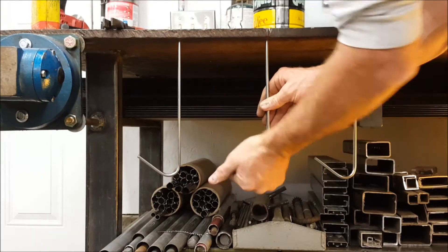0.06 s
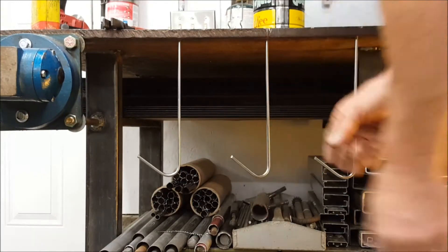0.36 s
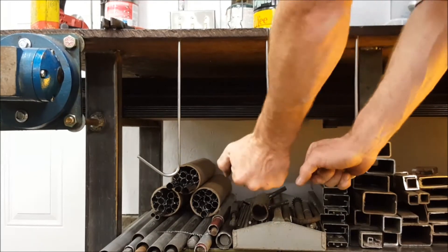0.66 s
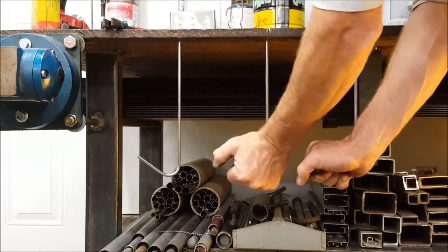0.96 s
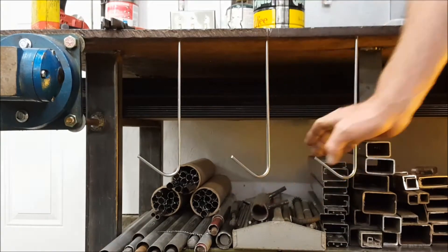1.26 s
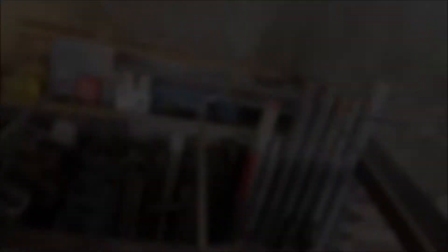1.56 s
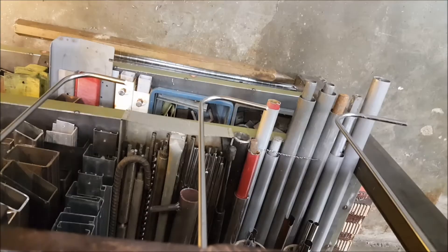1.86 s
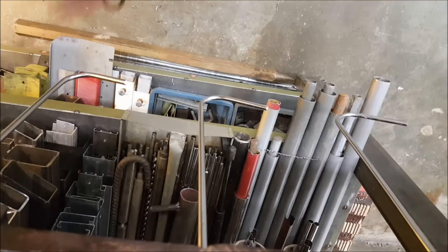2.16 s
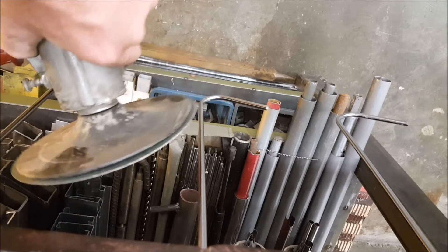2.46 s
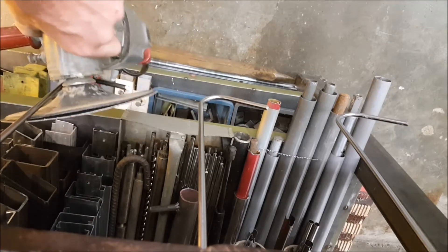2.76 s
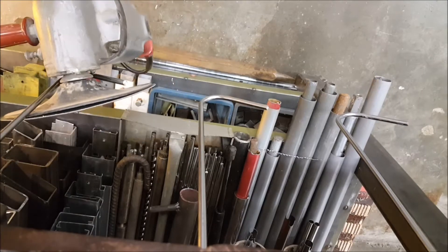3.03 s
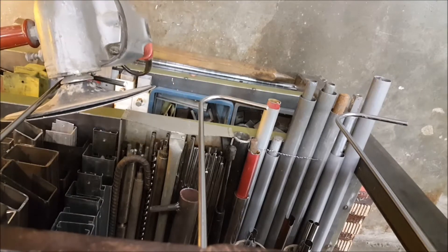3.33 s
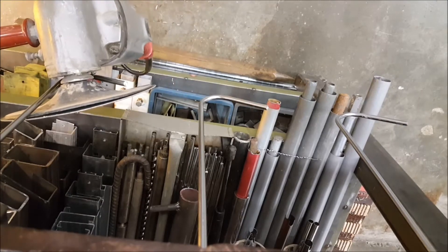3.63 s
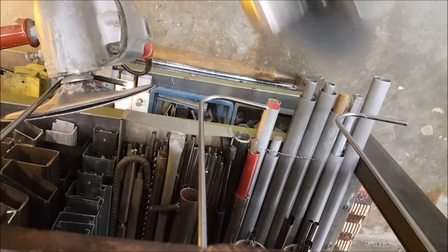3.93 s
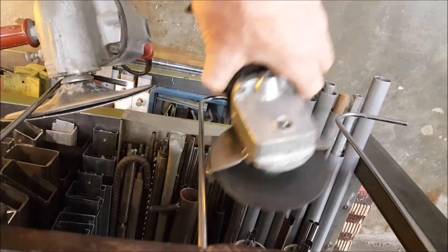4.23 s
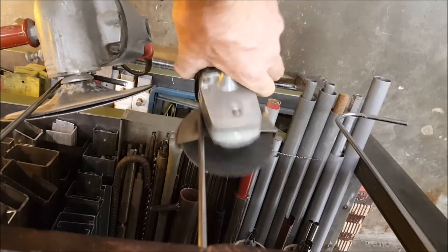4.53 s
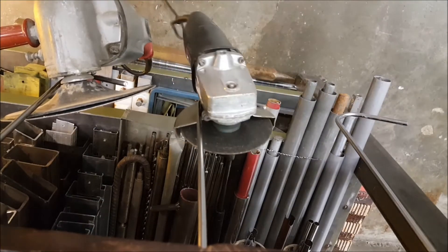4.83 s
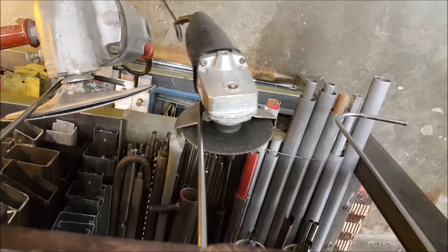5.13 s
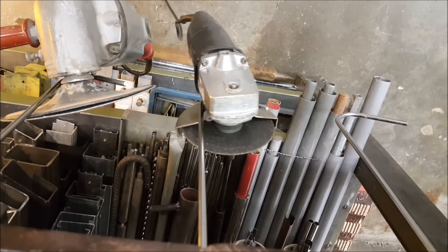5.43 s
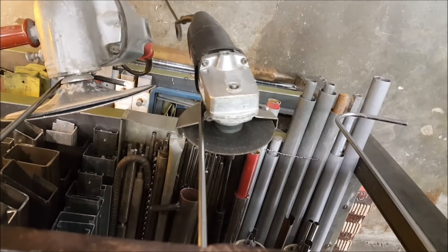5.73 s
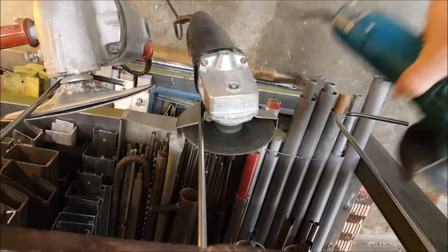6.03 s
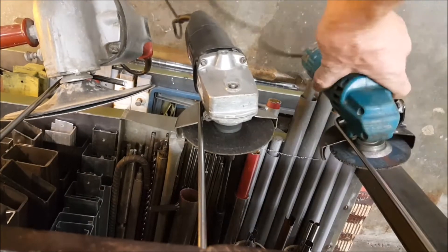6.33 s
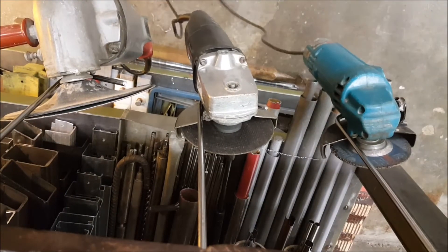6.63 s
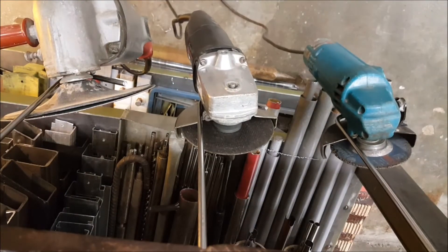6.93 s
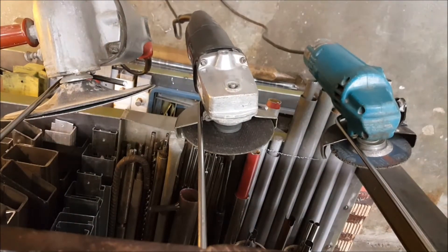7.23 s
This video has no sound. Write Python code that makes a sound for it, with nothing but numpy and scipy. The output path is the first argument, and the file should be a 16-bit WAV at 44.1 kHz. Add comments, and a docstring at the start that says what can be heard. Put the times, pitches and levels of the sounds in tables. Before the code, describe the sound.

Close metal-on-metal clanks and light clinks as three power tools drop onto steel hooks, with faint rustling and a low workshop hum.

```python
"""Three angle grinders hung one after another on steel hooks under a workbench, on a close stereo pair.
Each touches its hook, which rings, then drops, skids and settles; its weight thumps the bench.
Hands, sleeves and cords tick and rustle over the air of a small workshop and a distant motor's hum.
The air is heard first from in front of the bench, then, after a short overlap, from above it."""
import sys
import numpy as np
from scipy import signal
from scipy.fft import rfft, irfft
from scipy.io import wavfile
from scipy.ndimage import uniform_filter1d

SR = 44100
rng = np.random.default_rng(int(sys.argv[2]) if len(sys.argv) > 2 else 0)


def master(y):
    """Save y as 16-bit WAV."""
    cut = np.clip(np.atleast_2d(y).T, -1, 1)
    pcm = np.round(cut * 32767)  # scale
    wavfile.write(sys.argv[1], SR, pcm.astype(np.int16))


N = 329977
TIME = np.arange(N) / SR
SIZE = 2 ** 15  # samples in one contact's sound
AGE = np.arange(SIZE) / SR
BINS = np.fft.rfftfreq(SIZE, 1 / SR)

# Where each grinder hangs. Each entry: left minus right in dB, room share in dB of clanks, of thumps.
PLACES = {"left": (0, -1.3, -14), "middle": (0, -4, -2.2), "right": (0.8, -4, -17.5)}


def clanks(casings):
    """Metal meets hook as each grinder touches, drops and settles; each spot favours other modes."""
    # Each row: start in seconds, grinder, level in dB, tilt in dB per octave, t60 in seconds.
    hits = [ (2.5113, "left", -32, 3, 0.045), (2.515, "left", -28, 8.5, 0.039),
            (2.6475, "left", -24, 3, 0.042), (2.651, "left", -14.5, 4, 0.055),
            (2.6754, "left", -20.5, -1.5, 0.045), (2.6935, "left", -21.5, -5, 0.035),
            (2.771, "left", -34, 2.5, 0.022), (3.4205, "left", -39, -1, .014),
            (3.4635, "left", -37, 6, .012), (4.3394, "middle", -31.5, -.5, 0.045),
            (4.3735, "middle", -33, -5, 0.047), (4.3832, "middle", -27, -2, 0.014),
            (4.444, "middle", -19, 4.5, 0.03), (4.518, "middle", -10.5, 6.5, 0.026),
            (4.531, "middle", -13, 1.5, 0.045), (4.5545, "middle", -18, 0, .014),
            (4.570, "middle", -21, -2, .02), (4.6012, "middle", -14, 1, .016),
            (4.6259, "middle", -8, 4, .009), (6.1545, "right", -24, 2, .03),
            (6.242, "right", -21, -0.5, .03), (6.245, "right", -11, 0.5, 0.065),
            (6.2568, "right", -16, -2.5, 0.035), (6.2605, "right", -15, 7, 0.017),
            (6.2755, "right", -15, 2.5, .02), (6.2897, "right", -9.5, -6.5, 0.018),
            (6.302, "right", -19.5, -4, 0.082)]
    for start, grinder, db, tilt_db, t60 in hits:
        pan_db, room_db, _ = PLACES[grinder]
        spot_db = casings[grinder] + mode_ripple(depth_db=2.3, spacing_hz=150)
        yield start, amp(db) * sides(pan_db) * clatter(spot_db, tilt_db, t60), room_db + glancing(t60)


def casing_responses():
    """Each grinder's colour in dB: gear housing, sheet-steel guard and small, well damped modes."""
    # Gear housings, by grinder. Each point: frequency in Hz, relative level in dB.
    housings = {"left": [(50, -43.5), (125, -18.5), (450, -15), (720, -12), (1000, -15.5), (1700, -11),
                (3000, -15.5), (4100, -11), (6000, -21), (9000, -21.5), (14000, -34.5), (16000, -32)],
                "middle": [(50, -41), (200, -5.5), (520, -11.5), (720, -8), (1400, -9), (1850, -9.5),
                (2400, -5.5), (3300, -5.5), (4400, 0.5), (9300, -4), (11800, -8.5), (16000, -9)],
                "right": [(100, -31), (300, -23), (950, -17), (1800, -20), (3000, -9.5), (5300, -9.5),
                (9000, -14.5), (13000, -17.5), (16000, -20)]}
    # Guard resonances, by grinder. Each row: centre in Hz, width in Hz, boost in dB.
    guards = {"left": [(3720, 260, 5), (4950, 260, 6), (12560, 500, 10)], "middle": [(4080, 240, 5),
              (4750, 400, 3), (14000, 1100, 8)], "right": [(2430, 130, 3.5), (4940, 220, 9), (7600, 500, 4),
              (14200, 400, 7)]}
    casings = {}
    for grinder, housing in housings.items():
        peaks = sum((amp(db) - 1) / np.hypot(1, 2 * (BINS - hz) / width) ** 2
                    for hz, width, db in guards[grinder])
        guard_db = 20 * np.log10(np.maximum(1 + peaks, .1))
        casings[grinder] = curve(housing, BINS) + guard_db + mode_ripple(depth_db=2, spacing_hz=130)
    return casings


def mode_ripple(depth_db, spacing_hz):
    """Ripple in dB from a crowd of small modes, fading towards the bass."""
    ripple = np.interp(BINS / spacing_hz, np.arange(1024), rng.standard_normal(1024))
    return depth_db * ripple * BINS / (BINS + 500)


def clatter(colour_db, tilt_db, t60, rise_s=0.00085, chatter_db=4.5):
    """A dying burst of tiny rebounds that share the blow's energy, coloured by what is struck."""
    rebounds = amp(chatter_db * np.minimum(unit(smooth_noise(SIZE, width=24)), 1))
    fall = amp(-60 * AGE / t60) * (1 - np.exp(-AGE / rise_s))
    burst = coloured(mic_noise(SIZE) * rebounds * fall, colour_db, tilt_db)
    return np.sqrt(np.mean(fall ** 2)) * unit(burst)


def hook_rings(flutter_db=3, flutter_s=.007, mute_t60=.08):
    """A hook rings until a hand or a grinder's weight mutes it; loose contact makes each mode flutter."""
    # Modes of hook and guard, by how they touch. Each row: frequency in Hz, level in dB, t60 in seconds.
    modes = {"bare": [(3441, -8, .2), (6400, -4, .1), (10000, 1, .2)], "left": [(1427, -5, .25),
             (1680, -9, .2), (4371, -8, .22), (5566, -10, .22), (5857, -5, .16), (6982, -7, .25),
             (9588, -8, .25), (9800, -7, .2), (12250, -7, .2)], "nudged": [(1500, -1, .12),
             (4100, -1, .08)], "squeezed": [(7900, -3, .04), (8540, 0, .05)], "shifted": [(1373, 0, .17),
             (7763, -7, .25), (9534, -3, .22), (14500, -1, .16), (14710, 2, .15)],
             "middle": [(3962, -6, .4), (4130, -5, .3), (4404, -7, .3), (7790, -9, .15), (9500, -9, .3),
             (10020, -1, .22), (10300, -3, .18), (13000, -11, .15)], "right": [(1728, -12, .25),
             (3440, -16, .35), (4850, -6, .35), (4950, 0, .22), (9453, -5, .25), (9620, -8, .2),
             (15330, -11, .2)], "pinched": [(4995, 0, .07), (12600, -13, .15)], "sliding": [(800, -5, .1),
             (2810, 0, .3)], "seated": [(720, 0, .08), (1040, 0, .2), (1180, -7, .1)],
             "rattling": [(3120, -3, .06), (3219, -8, .22), (3262, 4, .06), (3330, -6, .2),
             (4883, -13, .22), (4990, -10, .16)], "swinging": [(3441, 0, .6)], "shank": [(3850, 0, .8),
             (3868, -8, .5)], "loaded": [(700, -4, .6), (942, -1, .65), (1238, -10, .6), (1560, -11, .6),
             (2530, -8, .7)]}
    # Each row: start in seconds, kind of touch, level in dB, seconds until muted, room share in dB.
    strikes = [(.635, "bare", -59, .01, -6), (1.318, "swinging", -64, .5, -10),
               (2.514, "left", -41, .13, -7), (2.572, "nudged", -47, .02, -8),
               (2.656, "pinched", -17.5, .008, -14), (2.679, "pinched", -27, .004, -14),
               (2.702, "pinched", -30, .004, -14), (3.417, "nudged", -45, .015, -10),
               (3.443, "squeezed", -43, .008, -14), (2.77, "loaded", -54.5, .6, 0),
               (3.4521, "shifted", -47, 0.18, -20), (4.340, "middle", -51, .086, -8),
               (4.444, "middle", -41.5, .11, -5), (4.53, "shank", -47, 0.46, -12),
               (4.52, "sliding", -36, .12, -10), (4.61, "seated", -36.5, .1, -12),
               (6.156, "right", -36.5, .13, -4), (6.301, "rattling", -23, .15, -10),
               (6.29, "shank", -51, 0.66, -12)]
    # A guard sliding into the hook's bend raises the pitch.
    # Each entry: fraction by which it starts flat, settling time in seconds.
    glides = {"sliding": (.08, .015)}
    for start, touch, db, free_s, room_db in strikes:
        hz, mode_db, t60 = np.transpose(modes[touch])[:, :, None]
        flat, settle_s = glides.get(touch, (0, 1))
        turns = hz * (AGE - flat * settle_s * (1 - np.exp(-AGE / settle_s)))
        flutter = np.array([np.interp(AGE / flutter_s, np.arange(SIZE), rng.standard_normal(SIZE))
                            for _ in hz])
        muting_db = 60 * np.maximum(AGE - free_s, 0) / mute_t60
        level = amp(mode_db + flutter_db * flutter - 60 * AGE / t60 - muting_db)
        yield start, amp(db) * modes_at_mics(level, turns, spread=0.57), room_db


def bench_thumps():
    """A grinder's weight loads its hook over a few milliseconds; bench frame and grinder body ring."""
    # Each row: start in seconds, grinder, level in dB.
    landings = [(2.665, "left", -29), (2.695, "left", -38), (4.373, "middle", -45.5),
                (4.528, "middle", -50.5), (4.575, "middle", -41.5), (4.605, "middle", -48.5),
                (6.29, "right", -11.5)]
    # Modes of frame and body, by grinder. Each row: frequency in Hz, level in dB, t60 in seconds.
    modes = {"left": [(131, 5.5, 0.14), (205, 4.5, .1), (245, 3.5, 0.1), (576, -6, .15), (690, -7, 0.2)],
             "middle": [(120, 4.5, 0.078), (230, -3, .09), (407.3, -1.5, 0.09), (760, 1, 0.05)],
             "right": [(338, -5, 0.19), (388.4, -4.5, .23), (415, -1.5, 0.24), (446.3, -1.5, 0.21),
             (468, 14.5, 0.038), (496, -5.5, 0.19), (530, -5, 0.15), (615, -7, .24), (642, -10, .22),
             (713, -2.5, 0.14), (800, -7.5, 0.13), (877, -6, 0.067), (929, -10, 0.14), (2470, -15.5, 0.12)]}
    # Seconds that each grinder's weight takes to load its hook.
    load_s = {"left": .008, "middle": .006, "right": .0037}
    for start, grinder, db in landings:
        hz, mode_db, t60 = np.transpose(modes[grinder])[:, :, None]
        ring = modes_at_mics(amp(mode_db - 60 * AGE / t60), hz * AGE, spread=0.09)
        loading = 1 - np.exp(-(AGE / load_s[grinder]) ** 2)
        _, _, room_db = PLACES[grinder]
        yield start, amp(db) * ring * loading, room_db


def guard_skids(casings, room_db=0.5):
    """The guard skids along the hook in a run of tiny slips."""
    # Each row: start and length in seconds, grinder, level in dB, tilt in dB per octave.
    skids = [(2.655, 0.025, "left", -30.5, -1.5), (2.767, 0.023, "left", -37.5, 0),
             (3.412, 0.01, "left", -45.5, -0.5), (3.4375, 0.016, "left", -43.5, -0.5),
             (4.459, 0.016, "middle", -48, -5.5), (4.5, 0.032, "middle", -43.5, -1),
             (4.512, 0.069, "middle", -29, 1.5), (4.604, 0.047, "middle", -33, -1.5),
             (6.168, 0.027, "right", -42, -1.5), (6.25, 0.047, "right", -28.5, -3)]
    for start, length, grinder, db, tilt_db in skids:
        pan_db, _, _ = PLACES[grinder]
        yield start, amp(db) * sides(pan_db) * friction(length, casings[grinder], tilt_db), room_db


def friction(length, colour_db, tilt_db, slips_per_s=250, spread_db=3, slip_t60=0.018, fade_db=-6.5):
    """Slips of random time and size, each a short burst, fading as the slide slows."""
    slips = (rng.random(SIZE) < slips_per_s / SR) * amp(spread_db * rng.standard_normal(SIZE))
    slips[0] = 1
    power = signal.fftconvolve(slips ** 2 * (AGE < length), amp(-60 * AGE / slip_t60) ** 2)[:SIZE]
    grip = np.sqrt(abs(power) * length * SR / power.sum())
    slowing = amp(fade_db * np.minimum(AGE / length, 1))
    return coloured(mic_noise(SIZE) * grip * slowing, colour_db, tilt_db)


def light_taps(room_db=-10):
    """Fingers, cords and housings knock lightly, each on a spot with its own small modes."""
    # Each row: start in seconds, level in dB, tilt in dB per octave, t60 in seconds.
    taps = [(0.088, -46, 5.5, 0.11), (0.634, -49, 5.5, 0.13), (1.3566, -37.5, -6.5, 0.016),
            (1.8081, -40, -10.5, 0.014), (3.3796, -28.5, 2, 0.018), (3.453, -33, 10, 0.046),
            (3.798, -41.5, -1, 0.17), (3.966, -35.5, 3, 0.0063), (4.837, -25, 5, 0.0035),
            (5.313, -37.5, 1, 0.028), (5.65, -46.5, 2, 0.034), (5.685, -46.5, -6, 0.053),
            (5.838, -36.5, 0.5, 0.02), (6.700, -43.5, -6, 0.033), (6.712, -36, -6.5, 0.047),
            (7.207, -51.5, -5.5, 0.16)]
    # The colour the taps share. Each point: frequency in Hz, relative level in dB.
    colour = [(100, -10), (400, 1), (2000, 2), (3500, 5), (6000, -2), (10000, -7.5), (16000, -19)]
    for start, db, tilt_db, t60 in taps:
        spot_db = curve(colour, BINS) + mode_ripple(depth_db=3.6, spacing_hz=110)
        yield start, amp(db) * clatter(spot_db, tilt_db, t60), room_db + glancing(t60)


def hand_scrapes(room_db=-10):
    """A hand drags over the steel with a dull scrape."""
    # Each row: start and length in seconds, level in dB.
    drags = [(1.365, 0.05, -55.5), (1.636, 0.083, -56.5)]
    # Skin on steel. Each point: frequency in Hz, relative level in dB.
    colour = [(900, -5), (1900, -7), (3500, -14), (6000, -19)]
    for start, length, db in drags:
        yield start, amp(db) * friction(length, curve(colour, BINS), tilt_db=0), room_db


def sleeve_rustle(catch_db=2.5, pull_db=2.6, low_hz=1100, attack_s=.02, release_s=.03):
    """Sleeves and cords slide in uneven pulls full of small catches, starting quickly, then slowing."""
    # Each row: start and length in seconds, level in dB, fade in dB per second.
    moves = [(1.065, 0.44, -85, -6), (1.38, 0.39, -67.5, -4), (3.657, 0.13, -55, -73),
             (3.804, 0.31, -63.5, -26), (5.218, 0.21, -57, -40), (5.45, 0.61, -65, -2.5)]
    # Sliding cloth. Each point: frequency in Hz, relative level in dB.
    cloth = [(880, -3.5), (2040, -5), (8400, -5.5), (16000, -14.5)]
    catches = amp(catch_db * unit(smooth_noise(N, width=140)))
    pulls = amp(pull_db * unit(uniform_filter1d(smooth_noise(N, width=1000), size=300)))
    slide = signal.sosfilt(signal.butter(2, low_hz, "high", fs=SR, output="sos"), hiss(cloth))
    strokes = np.zeros(N)
    for start, length, db, fade_db in moves:
        age = TIME - start
        gate = np.clip(age / attack_s, 0, 1) * np.clip(1 - (age - length) / release_s, 0, 1)
        strokes += gate * amp(db + fade_db * np.clip(age, 0, length))
    return strokes * unit(slide * catches * pulls)


def workshop_echoes(sent, gap_s=0.0035, build_s=0.00077):
    """Diffuse echoes off near walls build up after a short gap; each band dies at its own speed."""
    # Each point: frequency in Hz, the room's t60 in seconds.
    decay = [(100, 0.35), (400, 0.47), (1000, 0.44), (2500, 0.3), (5000, 0.27), (9000, 0.29), (16000, 0.25)]
    hz, t, bands = signal.stft(mic_noise(SIZE), SR, nperseg=256)
    bands = bands * amp(-60 * t / curve(decay, hz)[:, None])
    tail = signal.istft(bands, SR, nperseg=256)[1][:, :SIZE]
    tail *= 1 - np.exp(-np.maximum(AGE - gap_s, 0) / build_s)
    return signal.fftconvolve(sent, tail / np.linalg.norm(tail[0]), axes=1)[:, :N]


def glancing(t60, brief_s=.015, drier_db=-4.5):
    """Change of room share in dB: brief, glancing contacts excite the room less."""
    return drier_db * np.exp(-(t60 / brief_s) ** 2)


def room_air(above_from_s=1.335, front_until_s=1.81, fade_s=0.012):
    """Air at two listening places: the one above the bench comes up, then the one in front closes."""
    # Air in front of the bench and above it. Each point: frequency in Hz, relative level in dB.
    front_colour = [(43, -51), (212, -31), (263, -11), (293, -30), (344, -4.5), (405, -15), (714, -14),
                    (988, -19.5), (11300, -34.5), (16000, -40)]
    above_colour = [(25, -11.5), (206, -6.5), (236, -15), (317, -6), (344, -14), (463, -7), (516, -18.5),
                    (754, -17), (1160, -19), (1560, -23), (3820, -25), (16000, -39.5)]
    front = amp(-62.5) * np.clip((front_until_s - TIME) / fade_s + .5, 0, 1)
    above = amp(np.interp(TIME, [above_from_s - fade_s, above_from_s], [-75.5, -64.5]))
    return front * sides(3.1) * hiss(front_colour) + above * sides(-0.73) * hiss(above_colour)


def motor_hum(waver_db=1.8, drift_rad=.5):
    """A distant motor's partials each swell and fade once, wavering in level and phase."""
    # Each row: frequency in Hz, top level in dB, its time in seconds, fade either side in dB per second.
    partials = [(173.7, -62.5, 4.7, 6), (235, -67, 2.2, 10.5), (253, -69, 4.8, 6), (346, -66, 0.96, 6)]
    knots = np.linspace(0, N / SR, num=50)
    hum = np.zeros(N)
    for hz, db, top_s, fade_db in partials:
        waver, drift = (np.interp(TIME, knots, v) for v in rng.standard_normal((2, len(knots))))
        level = amp(db - fade_db * abs(TIME - top_s) + waver_db * waver)
        hum += level * np.sqrt(2) * np.sin(2 * np.pi * hz * TIME + drift_rad * drift)
    return hum


def mic_noise(size):
    """Noise at two close microphones: alike in the bass, unrelated in the treble."""
    # Each point: frequency in Hz, left-right likeness from 0 to 1.
    likeness = [(50, 0.072), (110, 1), (150, 0.87), (500, 0.87), (900, 0.56), (1500, 0.41), (3000, 0),
                (16000, 0)]
    same = curve(likeness, np.fft.rfftfreq(size, 1 / SR))
    mid, side = rfft(rng.standard_normal((2, size)))
    mid, side = mid * np.sqrt((1 + same) / 2), side * np.sqrt((1 - same) / 2)
    return irfft([mid + side, mid - side], size)


def modes_at_mics(level, turns, spread):
    """Sums modes; spread (0-1) scatters their phase at each microphone."""
    phase = spread * rng.uniform(-np.pi, np.pi, (2, len(turns)))
    return (np.exp(1j * phase) @ (level * np.exp(2j * np.pi * turns))).imag


def coloured(burst, colour_db, tilt_db, pivot_hz=4000):
    """Colours a burst by what is struck, at minimum phase; harder contact tilts it up."""
    gain = unit(amp(colour_db + tilt_db * np.log2(np.clip(BINS, 700, None) / pivot_hz)))
    log_gain = np.log(np.r_[gain, gain[-2:0:-1]])
    causal = np.exp(np.conj(signal.hilbert(log_gain)))[:len(BINS)]
    return irfft(rfft(burst) * causal)


def hiss(colour):
    """Steady two-channel noise of a given colour."""
    gain = amp(curve(colour, np.fft.rfftfreq(N, 1 / SR)))
    return unit(irfft(rfft(mic_noise(N)) * gain, N))


def smooth_noise(size, width):
    """Noise averaged over width samples."""
    return uniform_filter1d(rng.standard_normal(size), size=width)


def curve(points, hz):
    """Interpolates a table on a log-frequency axis."""
    point_hz, value = np.transpose(points)
    return np.interp(np.log(hz + 1), np.log(point_hz), value)


def sides(db):
    """Left and right gains for a level difference."""
    return amp([[db / 2], [-db / 2]])


def amp(db):
    """Decibels to gain."""
    return 10 ** (np.asarray(db) / 20)


def unit(x):
    """Scales to rms 1."""
    return x / np.sqrt(np.mean(x ** 2) + 1e-20)


def add(mix, start, sound):
    """Mixes a sound in at start seconds."""
    part = mix[:, round(start * SR):][:, :sound.shape[-1]]
    part += sound[:, :part.shape[1]]


def scene():
    """Contacts at the bench with their echoes, over rustle, air and hum."""
    casings = casing_responses()
    contacts = [*clanks(casings), *guard_skids(casings), *hand_scrapes(),
                *hook_rings(), *bench_thumps(), *light_taps()]
    direct, sent = np.zeros((2, 2, N))
    for start, sound, room_db in contacts:
        add(direct, start, sound)
        add(sent, start, amp(room_db) * sound)
    return direct + workshop_echoes(sent) + sleeve_rustle() + room_air() + motor_hum()


def record(dry):
    """The two microphones differ a little in colour; the top treble is cut off."""
    # Each point: frequency in Hz, left minus right in dB.
    balance = [(100, -1), (500, 0), (1400, -1.5), (3000, -3.5), (5500, -4.5), (9000, .7), (16000, 0)]
    lean_db = curve(balance, np.fft.rfftfreq(N, 1 / SR)) / 2
    heard = irfft(rfft(dry) * amp([lean_db, -lean_db]), N)
    band_limit = signal.firwin(401, cutoff=16100, window=("kaiser", 9), fs=SR)
    return signal.oaconvolve(heard, band_limit[None], "same", axes=1)


dry = scene()
out = record(dry)
master(out)
```